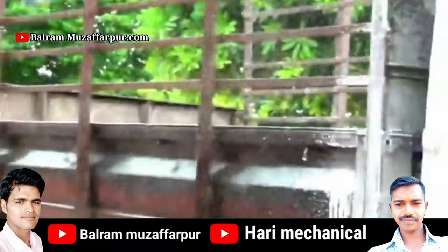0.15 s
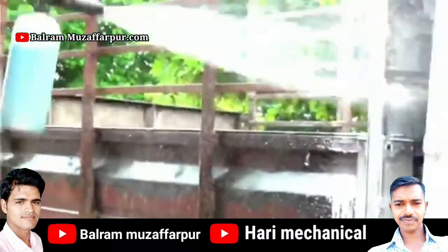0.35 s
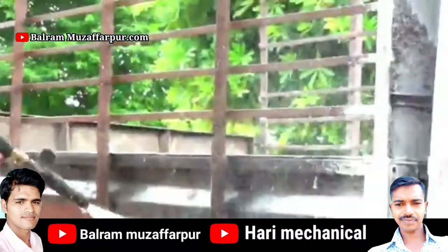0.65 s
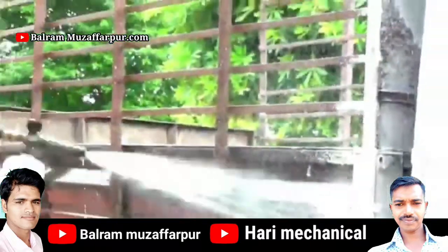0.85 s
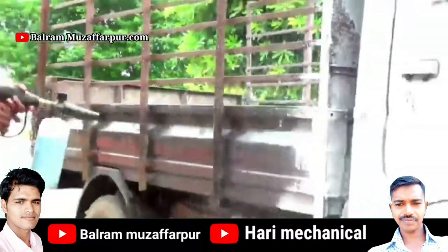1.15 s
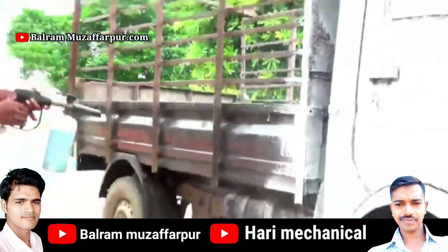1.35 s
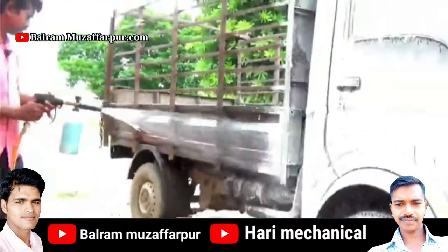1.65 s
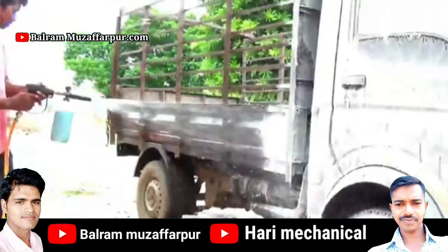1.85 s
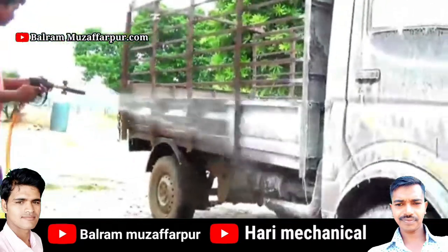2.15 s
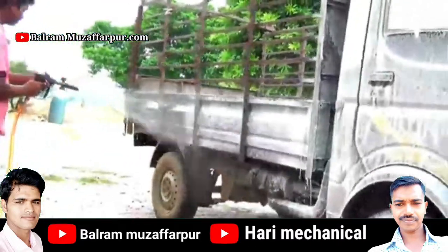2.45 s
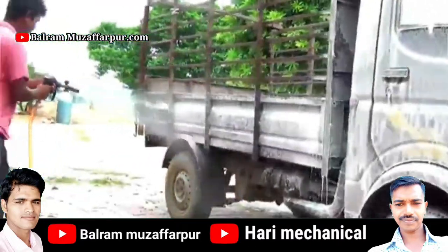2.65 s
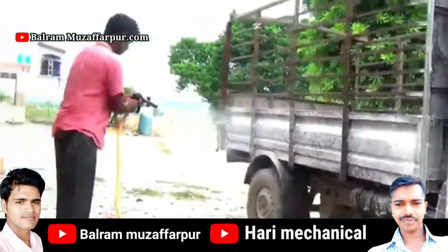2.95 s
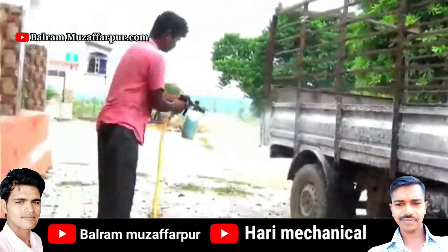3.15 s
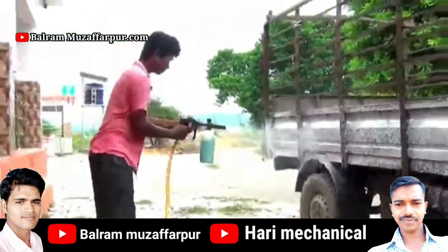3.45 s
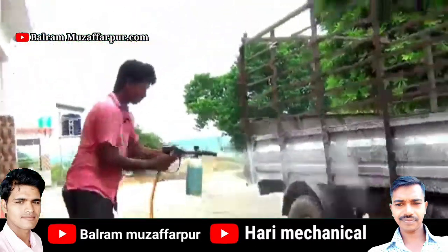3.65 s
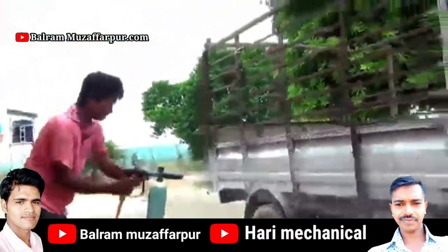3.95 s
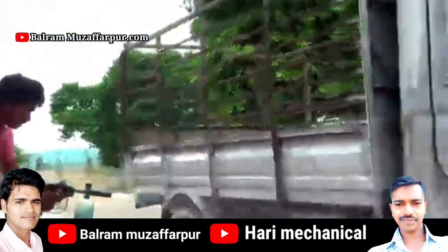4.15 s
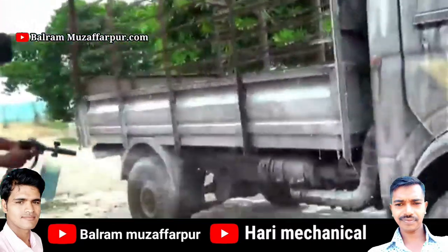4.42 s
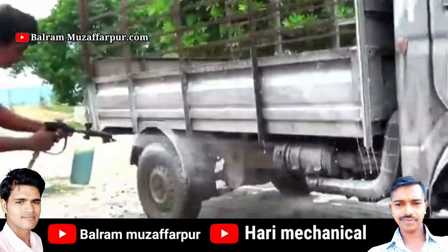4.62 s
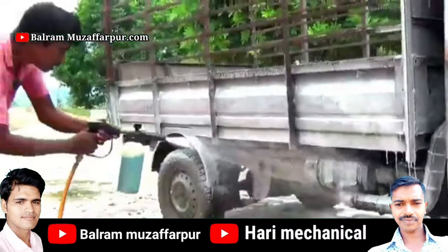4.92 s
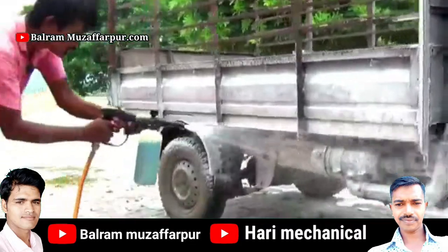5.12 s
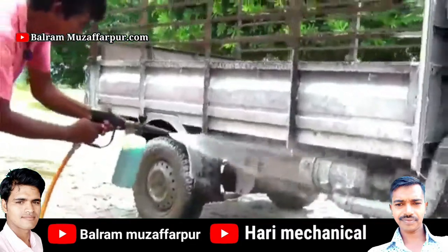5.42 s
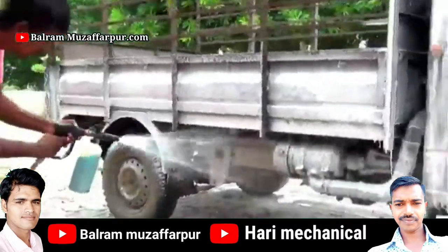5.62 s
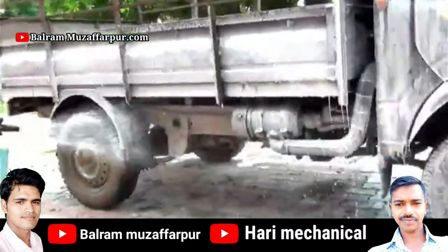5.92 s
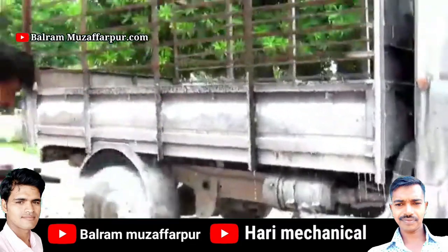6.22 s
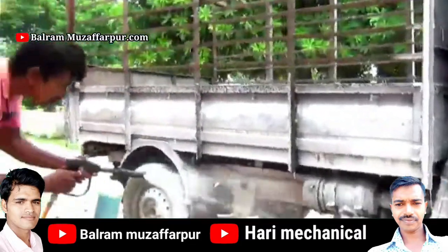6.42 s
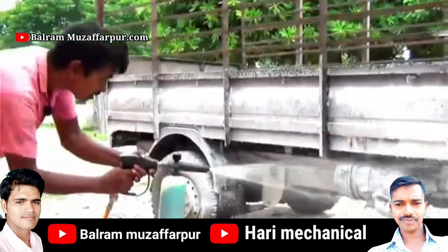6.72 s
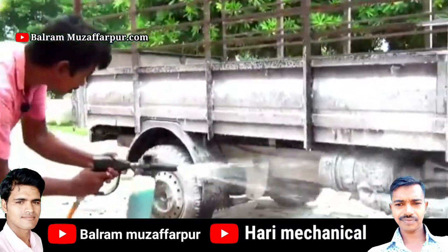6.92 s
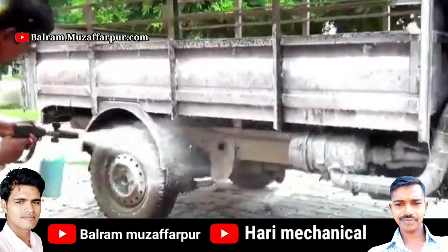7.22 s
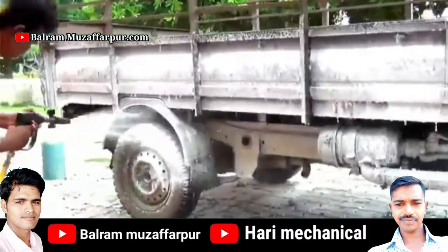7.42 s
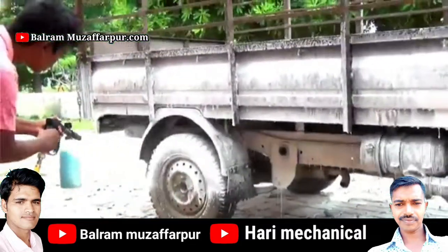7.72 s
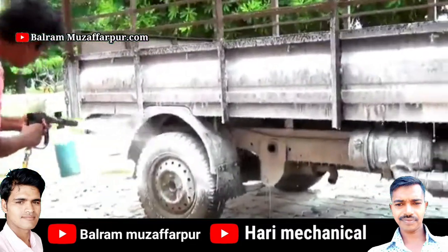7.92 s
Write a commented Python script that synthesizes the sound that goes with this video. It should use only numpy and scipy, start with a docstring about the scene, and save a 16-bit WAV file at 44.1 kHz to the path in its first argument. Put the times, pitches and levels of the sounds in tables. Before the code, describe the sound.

Steady, fluttering water-jet hiss with sizzling splashes on truck metal, recorded close outdoors. Early on a plastic trigger clacks, the jet chokes to near quiet with small rattles and a weak dribble, then two bright spits lead to full spray. The hiss sweeps and brightens in bursts as the lance moves from panels to wheel, panel drumming fading, while wind buffets and soft bumps thud low on the microphone.

```python
"""A water jet hisses, drums and fizzes on a small truck outdoors, stops for about half a second and sputters back.
The jet is coloured noise; panels, fizz and mist are random droplet impacts, coloured by what they strike.
A close reflection sweeps the hiss, fizz and mist; many weak echoes ripple the whole spray.
Wind on the microphone is low noise in gusts; a trigger clack and big drops are struck modes.
Trigger rattles, spits and soft microphone bumps are short puffs of noise; a steady yard noise lies beneath."""
import sys
import numpy as np
from scipy import signal
from scipy.fft import rfft, irfft, next_fast_len
from scipy.io import wavfile
from scipy.ndimage import uniform_filter1d, map_coordinates

SR = 44100
rng = np.random.default_rng(int(sys.argv[2]) if len(sys.argv) > 2 else 0)


def bounce(signal):
    """Save signal as a 16-bit WAV file at the path given by the first command-line argument."""
    frames = np.transpose(np.atleast_2d(signal))
    limited = np.clip(frames, -1, 1)
    pcm = np.round(limited * 32767).astype(np.int16)
    wavfile.write(sys.argv[1], SR, pcm)


N = 356093
TIME_S = np.arange(N) / SR

# Spectra of the spray. Each row: frequency in Hz, relative density in dB.
JET_SPECTRUM = [(150, -23), (330, -4.5), (480, -6), (900, 3), (1300, 0), (1900, -6.5), (2800, 1.5),
                (3900, -1.5), (4700, 4), (5500, 6), (7000, 7), (10000, -9), (15000, -26)]
PANEL_SPECTRUM = [(330, -7), (470, -2.5), (600, 0.5), (800, -14.5), (1100, -23), (1400, -1.5), (1580, 2),
                  (1900, -2), (2200, 2), (2400, 1.5), (2600, 0.5), (2950, 0), (4200, -5.5), (7000, -45)]
FIZZ_SPECTRUM = [(3000, -15), (6000, -11), (7500, -2.5), (8500, 2), (9600, 3), (10800, 0), (12000, -8.5),
                 (13200, -22), (15000, -16)]
MIST_SPECTRUM = [(7000, -33), (10500, 9), (12000, 9.5), (14000, 6), (15000, -2)]
# Aim, from the side panels down to the wheel at about 4 s.
# Each row: time in seconds, base hiss level in dB, drumming level in dB, mist relative to fizz in dB.
AIM_PATH = [(0, -34, -45, -5.5), (.65, -38, -41.5, -12), (1, -37, -39, -9), (1.8, -37, -38, -9.5),
            (2.4, -39, -39.5, -11), (3.2, -36.5, -41.5, -14), (3.45, -36.5, -38, -7),
            (4, -33.5, -44.5, -8.5), (4.35, -37, -47, -3), (5.2, -35.5, -45.5, -9.5), (5.9, -37, -49, -2.5),
            (6.7, -36.5, -46, -7.5), (7.1, -36, -46.5, -4), (8.07, -37, -46, -8)]
# Hollow ring of the lance. Each row: time in seconds, centre in Hz, level in dB.
LANCE_RING = [(0, 3046, -53), (.6, 3100, -45), (.9, 3306, -40), (1.65, 3396, -44.5), (2.3, 3510, -40),
              (2.8, 3280, -44.5), (3.95, 3373, -43), (4.25, 3333, -50), (5.25, 3347, -42),
              (5.75, 3406, -42), (6.15, 3390, -53), (6.65, 3477, -44), (7.05, 3380, -41),
              (7.45, 3390, -46.5), (8.07, 3350, -47.5)]
# Close reflection. Each row: time in seconds, delay in ms, mean strength from 0 to 1.
CLOSE_REFLECTION = [(0, 0.1, 0.6), (.35, 0.087, 0), (.65, 0.087, 0.25), (2.4, 0.099, 0.42),
                    (3.15, 0.11, 0.23), (3.45, .108, 0.4), (4, 0.11, 0.53), (4.4, 0.18, .45),
                    (5.15, 0.18, 0.7), (5.35, 0.202, .5), (5.55, 0.23, 0.13), (5.8, .214, 0.48),
                    (6.1, 0.19, 0.63), (6.65, 0.2, 0.26), (7.1, 0.27, 0.58), (7.35, 0.23, 0.23),
                    (7.6, .205, 0.43), (8.07, 0.19, .42)]
# Jet catching metal, foam splashing up. Each row: start in seconds, hold in seconds, fizz level in dB, fade in dB/s.
FOAM_SPLASHES = [(.2, .05, -32.5, 40), (.39, 0.24, -32, 110), (.79, 0.11, -29.5, 60), (.9, 0.1, -28, 100),
                 (1.645, 0.23, -27, 13.5), (3.02, .15, -36, 112), (3.36, 0.3, -29, 34),
                 (4.13, 0.033, -35.5, 63), (4.38, 0.18, -35, 68), (4.56, .3, -31, 7.5),
                 (5.6, 0.12, -37.5, 98), (5.92, 0.024, -32, 60), (6.05, 0.14, -28, 450),
                 (6.28, 0.012, -27.5, 102), (6.5, .08, -33.5, 154), (6.73, .08, -34.5, 155),
                 (7.08, .16, -35, 200), (7.32, 0.24, -35, 115), (7.86, 0.08, -28, 73)]

# Gusts on the microphone. Each row: start in seconds, hold in seconds, level in dB, fade in dB/s.
WIND_GUSTS = [(0, .04, -39.5, 70), (.9, 0.014, -21.5, 84), (1.08, 0.11, -28.5, 60),
              (1.21, 0.034, -28.5, 37), (2.12, 0.43, -18.5, 43), (3.1, 0.029, -34.5, 87),
              (3.3, 0.12, -37.5, 110), (4.29, 0.16, -36.5, 90), (5.1, 0.17, -47, 80), (5.52, 0.22, -43, 60),
              (5.73, 0.16, -30.5, 160), (7.04, 0.2, -40.5, 60), (7.235, 0.16, -20, 198),
              (7.52, 0.24, -39.5, 65), (7.76, 0.1, -31.5, 60), (7.9, .17, -28.5, 63)]
# Soft bumps on the microphone. Each row: start in seconds, level in dB, length in seconds.
MIC_BUMPS = [(0.751, -32.5, 0.015), (4.19, -35.5, 0.036), (5.01, -42.5, 0.053), (5.68, -40, 0.083),
             (6.08, -37, 0.033), (6.495, -39.5, 0.036)]
# Spectra of wind, bumps and yard. Each row: frequency in Hz, relative density in dB.
WIND_SPECTRUM = [(12, -25), (22, 4.5), (42, 5.5), (85, -6), (130, -20), (195, -40), (280, -34), (450, -52),
                 (900, -74)]
EDDY_SPECTRUM = [(60, -6), (110, 1), (190, -11.5), (300, -34.5), (600, -36)]
BUMP_SPECTRUM = [(25, -6), (70, 16.5), (170, 6), (280, -4), (550, -12.5), (1200, -50)]
YARD_SPECTRUM = [(30, -13), (150, 12.5), (400, -4.5), (1000, 0), (2200, -3), (4000, -5), (9000, -5.5),
                 (15000, -9.5)]

# Sharp contacts. Each row: time in seconds, relative strength in dB.
DROP_HITS = [(0.854, -16), (0.918, 2), (0.9315, 4), (1.011, -16), (4.1238, -14), (6.038, -2), (6.103, -34),
             (6.216, -19)]
CLACK_HIT = [(0.9878, -9)]
# Ringing modes. Each row: frequency in Hz, relative level in dB, t60 in seconds.
DROP_RESONANCES = [(8300, 1, 0.002), (9900, -1.5, .003), (11200, 2, .002)]
GUN_RESONANCES = [(1040, -21, 0.029), (1566, -10, 0.053), (2000, -10, 0.023), (2230, -7, 0.014),
                  (2660, -7, 0.019), (4130, -9, .012), (4470, -1.5, 0.0075)]
# Loose trigger rattling while the jet is stopped. Each row: start in seconds, level in dB, length in seconds.
TRIGGER_RATTLES = [(1.208, -45, 0.0069), (1.217, -40, 0.0049), (1.226, -53, 0.024), (1.469, -46, 0.0089)]
# Spits of water as the jet starts again. Each row: start in seconds, level in dB, length in seconds.
RESTART_SPITS = [(1.505, -31, .022), (1.582, -25, .018)]
# Spectra of rattles and spits. Each row: frequency in Hz, relative density in dB.
RATTLE_SPECTRUM = [(600, 0), (1300, -12), (1700, 3), (2300, 4), (3100, -1), (3800, -24), (8000, -32)]
SPIT_SPECTRUM = [(500, -3), (5000, -6), (9500, 7.5), (15000, -6)]

# trigger let go, squeezed until the valve weeps, then opened fully
LET_GO_S, SQUEEZE_S, OPEN_S = 1.025, 1.3, 1.505
SHUT_DB_PER_S, SHUT_DB, WEEP_DB = 391, -32, -18
DRIBBLE_RMS_DB = 5  # unevenness of the weeping valve
OPENING_DB, BUILD_UP_S = -4.5, 0.088
FOAM_LAG_S = .078  # fizz behind the opening
SPLASH_RISE_DB_PER_S, STEADY_FIZZ_DB = 236, -38
HISS_SHARE = 0.18  # share of the fizz's dB swing taken on by the hiss
GUST_RISE_DB_PER_S, CALM_DB = 330, -51.5
CUTOFF_HZ = 15050


def from_db(db):
    """Decibels to amplitude gain."""
    return 10 ** (np.asarray(db) / 20)


def rms_one(x):
    """Scale to rms 1."""
    return x / np.sqrt(np.mean(x ** 2) + 1e-20)


def in_time(rows):
    """Interpolate each column of a timed table to every sample."""
    s, *columns = np.transpose(rows)
    return [np.interp(TIME_S, s, column) for column in columns]


def drift(corner_hz):
    """Slow random curve of rms 1: white noise through a double pole, at SR / 40."""
    r = np.exp(-2 * np.pi * corner_hz * 40 / SR)
    white = rng.standard_normal(N // 40 + 2002)
    slow = signal.lfilter([1], [1, -2 * r, r * r], white)[2000:]  # drop the settling
    return np.interp(np.arange(N) / 40, np.arange(len(slow)), rms_one(slow))


def coloured(x, spectrum):
    """Filter to a spectrum, interpolated in log Hz, that falls away beyond its ends; rms 1."""
    size = next_fast_len(N)
    hz = np.maximum(np.arange(size // 2 + 1) * SR / size, 1)
    points_hz, db = np.transpose(spectrum)
    low_end = 1 + (points_hz[0] / hz / 2) ** 4
    high_end = 1 + (hz / points_hz[-1] / 2) ** 4
    gain = from_db(np.interp(np.log(hz), np.log(points_hz), db)) / np.sqrt(low_end * high_end)
    return rms_one(irfft(rfft(x, size) * gain, size)[:N])


def noise(spectrum):
    """Smooth turbulence: coloured Gaussian noise."""
    return coloured(rng.standard_normal(N), spectrum)


def droplets(per_s, mean_db):
    """Random impacts of either sign: many small ones, a few large, capped at 16 dB."""
    size_db = np.minimum(mean_db * rng.exponential(1, N), 16)
    impacts = from_db(size_db) * rng.choice([-1, 1], N)
    return impacts * (rng.random(N) < per_s / SR)


def swells(rows, rise_db_per_s, rest_db):
    """Level in dB of events that rise, hold and fade; powers add to a resting level."""
    power = from_db(rest_db) ** 2
    for s, hold_s, db, fade_db_per_s in rows:
        before_db = rise_db_per_s * np.maximum(s - TIME_S, 0)
        after_db = fade_db_per_s * np.maximum(TIME_S - s - hold_s, 0)
        power = power + from_db(db - np.minimum(before_db + after_db, 100)) ** 2
    return 10 * np.log10(power)


def puffs(rows):
    """Gain of short swells that rise fast and fall more slowly."""
    gain = 0
    for s, db, length_s in rows:
        progress = np.clip((TIME_S - s) / length_s, 0, 1)
        gain = gain + from_db(db) * np.sin(np.pi * np.sqrt(progress))
    return gain


def struck(hits, modes):
    """Each hit is an impulse that sets all the modes ringing as decaying sines."""
    clicks, out = np.full(N, 1e-18), 0  # tiny floor avoids denormals
    for s, db in hits:
        clicks[round(s * SR)] = from_db(db)
    for hz, db, t60_s in modes:
        r, w = from_db(-60 / (t60_s * SR)), 2 * np.pi * hz / SR
        ringing = signal.lfilter([0, np.sin(w)], [1, -2 * r * np.cos(w), r * r], clicks)
        out = out + from_db(db) * ringing
    return out


def band(x, low_hz, high_hz):
    """Second-order Butterworth bandpass."""
    return signal.sosfilt(signal.butter(2, [low_hz, high_hz], "band", fs=SR, output="sos"), x)


def flow(lag_s):
    """Valve gain: shuts fast, weeps as the trigger is squeezed, builds up to full once open."""
    open_s = OPEN_S + lag_s
    closing_db = np.maximum(-SHUT_DB_PER_S * np.maximum(TIME_S - LET_GO_S, 0), SHUT_DB)
    squeezed_db = np.interp(TIME_S, [SQUEEZE_S, OPEN_S], [SHUT_DB, WEEP_DB])
    weeping_db = squeezed_db + DRIBBLE_RMS_DB * drift(12)
    opening_db = OPENING_DB * np.clip(1 - (TIME_S - open_s) / BUILD_UP_S, 0, 1)
    db = np.select([TIME_S < SQUEEZE_S, TIME_S < open_s], [closing_db, weeping_db], opening_db)
    return from_db(uniform_filter1d(db, size=128))


def reflected(x):
    """Copies a fraction of a millisecond late cut moving notches; power is evened over 0.2 s."""
    delay_ms, strength = in_time(CLOSE_REFLECTION)
    lag = delay_ms * SR / 1000  # samples
    dull = np.convolve(x, [.14, .72, .14], "same")
    positions = np.arange(N) - np.array([lag, 2 * lag])
    once, twice = map_coordinates(dull, [positions], order=3)
    both = x + strength * (1 + .35 * drift(3)) * (once - twice / 4)
    return both / np.sqrt(uniform_filter1d(both ** 2, SR // 5) + 1e-12)


def hollow_ring(centre_hz, width_hz):
    """Turbulence in a resonance: lowpassed noise pair on a carrier whose centre wanders."""
    lowpass = signal.butter(2, width_hz / 2, fs=SR, output="sos")
    a, b = signal.sosfilt(lowpass, rng.standard_normal((2, N)))
    phase = 2 * np.pi * np.cumsum(centre_hz) / SR
    return rms_one(a * np.cos(phase) + b * np.sin(phase))


def echoed(x, strength=0.072, sway=0.0501, count=12):
    """Weak paths by way of truck and ground, changing as the lance is carried, ripple the spectrum."""
    out, n = x, np.arange(N)
    for k, delay_s in enumerate(np.geomspace(.0016, .021, count)):
        late = delay_s * (1 + sway * drift(0.291)) * SR  # samples
        out = out + (-1) ** k * strength * np.interp(n - late, n, x)
    return out


def spray():
    """Jet turbulence, lance ring, panel drumming, fizz and mist, all gated by the valve."""
    hiss_db, panel_db, mist_offset_db = in_time(AIM_PATH)
    ring_hz, ring_db = in_time(LANCE_RING)
    fizz_db = swells(FOAM_SPLASHES, SPLASH_RISE_DB_PER_S, STEADY_FIZZ_DB) + 0.39 * drift(24)
    hiss_db = hiss_db + HISS_SHARE * (fizz_db - fizz_db.mean())
    mist_db = fizz_db + mist_offset_db
    # foam leaves the nozzle in clumps, so hiss, fizz and mist flutter together
    clumps = 0.58 * drift(37) + 0.32 * drift(210)

    hiss = from_db(hiss_db + 1.66 * clumps) * reflected(noise(JET_SPECTRUM))
    ring = from_db(ring_db + 1.54 * drift(24)) * hollow_ring(ring_hz, width_hz=510)
    panel_hits = coloured(droplets(per_s=7000, mean_db=3.0), PANEL_SPECTRUM)
    panel = from_db(panel_db + 1.54 * drift(29)) * panel_hits
    fizz_hits = coloured(droplets(per_s=17000, mean_db=3.5), FIZZ_SPECTRUM)
    fizz = from_db(fizz_db + 1.07 * clumps) * reflected(fizz_hits)
    mist_hits = coloured(droplets(per_s=20000, mean_db=4.5), MIST_SPECTRUM)
    mist = from_db(mist_db + 2.5 * clumps) * reflected(mist_hits)
    return echoed(flow(0) * (hiss + ring + panel + mist) + flow(FOAM_LAG_S) * fizz)


def wind():
    """Lumpy low pressure on the microphone, with bumps; stronger gusts shed more of the higher eddies."""
    gust_db = swells(WIND_GUSTS, GUST_RISE_DB_PER_S, CALM_DB)
    slow = from_db(gust_db + 1.46 * drift(14)) * noise(WIND_SPECTRUM)
    eddy_db = 1.4 * gust_db + 2.5 * drift(30) - 4.5
    eddies = from_db(eddy_db) * noise(EDDY_SPECTRUM)
    bumps = puffs(MIC_BUMPS) * noise(BUMP_SPECTRUM)
    return slow + eddies + bumps


def yard():
    """Steady broadband outdoor noise at -56 dB rms."""
    return from_db(-56.0) * noise(YARD_SPECTRUM)


def big_drops():
    """Single large drops: very short, high struck modes."""
    return from_db(-13) * band(struck(DROP_HITS, DROP_RESONANCES), 6500, 13000)


def gun():
    """A trigger clack as struck modes, and rattles as noise puffs."""
    # small plastic trigger radiates neither bass nor extreme treble
    clack = band(struck(CLACK_HIT, GUN_RESONANCES), 900, 5600)
    rattles = puffs(TRIGGER_RATTLES) * noise(RATTLE_SPECTRUM)
    return from_db(-1.5) * clack + rattles


def spits():
    """Bright sputters of droplets while the pressure builds."""
    return puffs(RESTART_SPITS) * coloured(droplets(per_s=9500, mean_db=2.0), SPIT_SPECTRUM)


def scene():
    """Sum everything at one microphone, the same in both channels."""
    mono = spray() + wind() + yard() + big_drops() + gun() + spits()
    return np.array([mono, mono])


def record(dry):
    """Cut the top steeply with an elliptic lowpass."""
    return signal.sosfilt(signal.ellip(14, .1, 90, CUTOFF_HZ, fs=SR, output="sos"), dry)


dry = scene()
out = record(dry)
bounce(out)
```